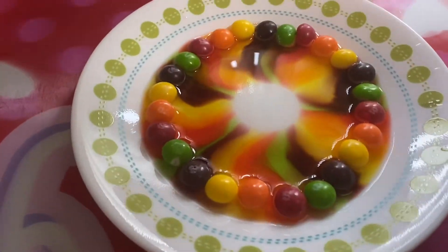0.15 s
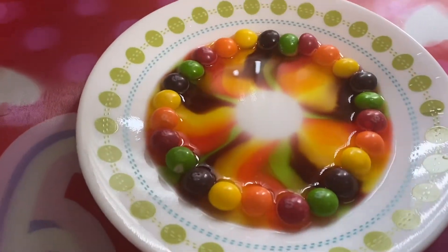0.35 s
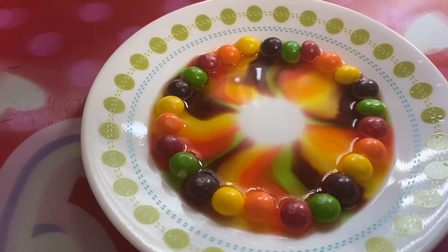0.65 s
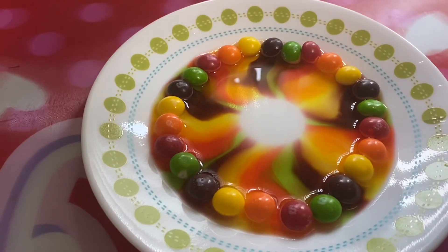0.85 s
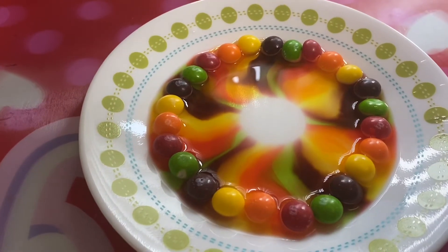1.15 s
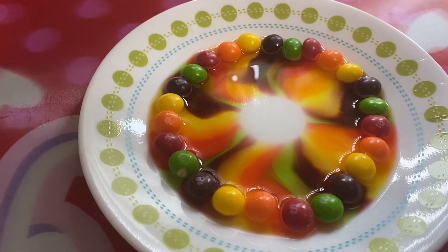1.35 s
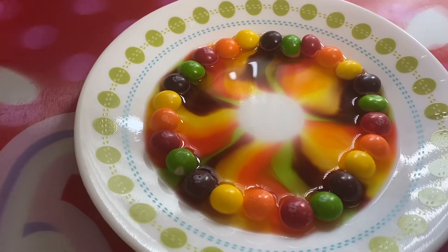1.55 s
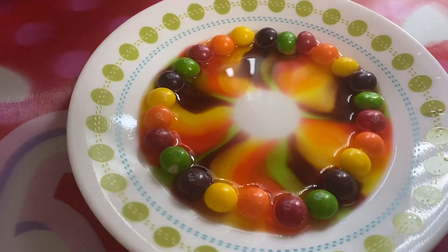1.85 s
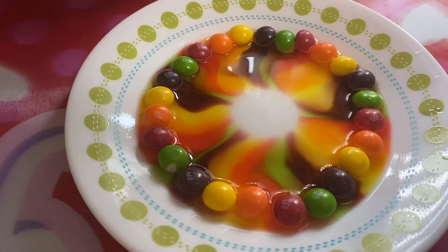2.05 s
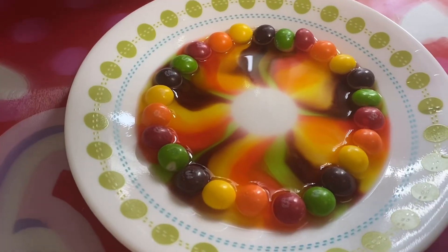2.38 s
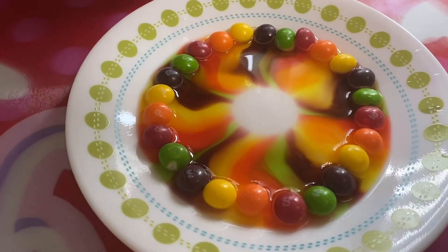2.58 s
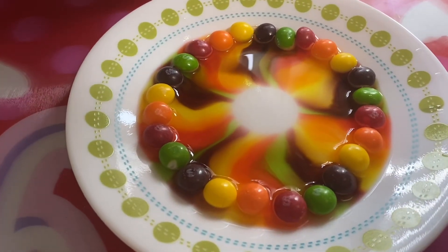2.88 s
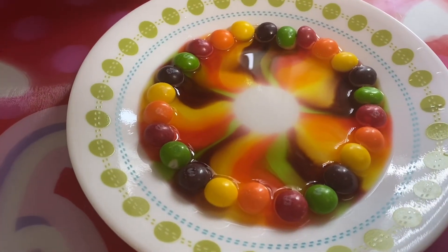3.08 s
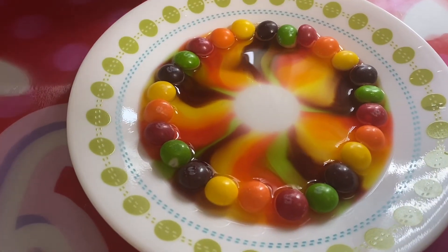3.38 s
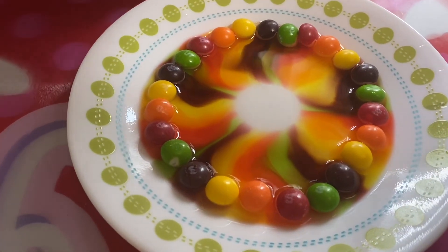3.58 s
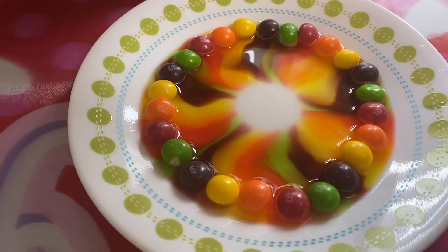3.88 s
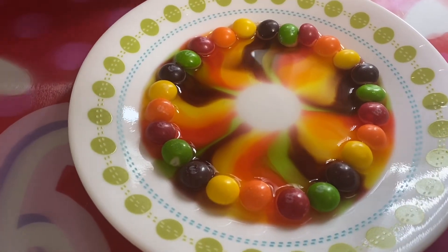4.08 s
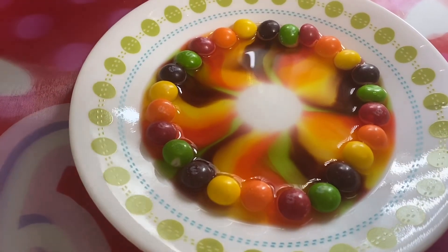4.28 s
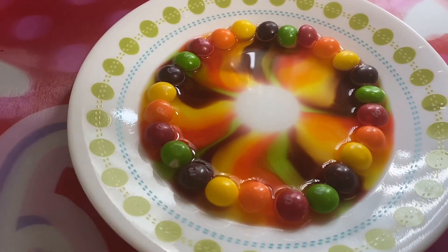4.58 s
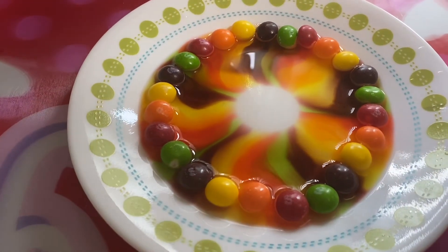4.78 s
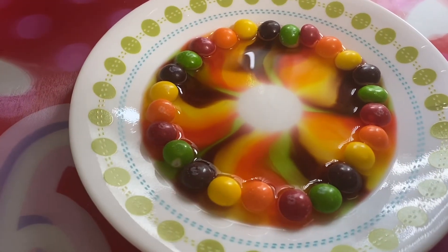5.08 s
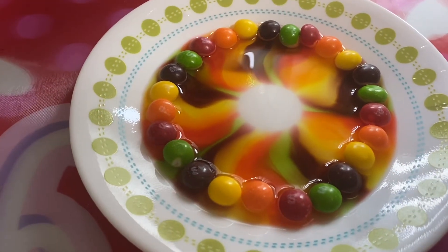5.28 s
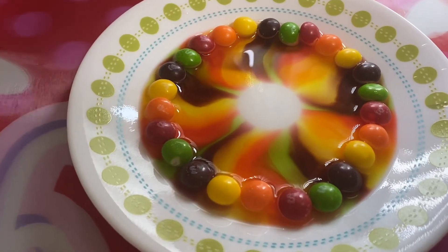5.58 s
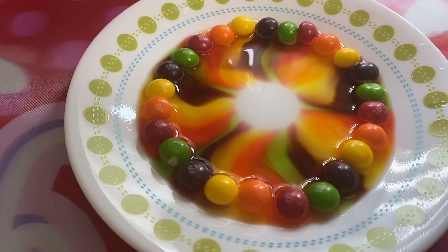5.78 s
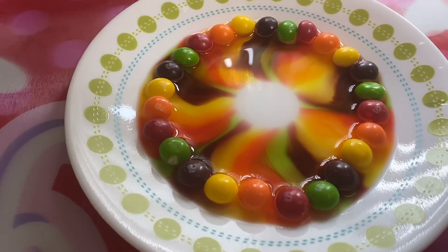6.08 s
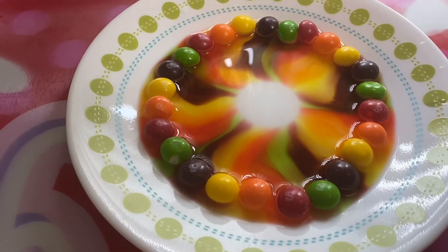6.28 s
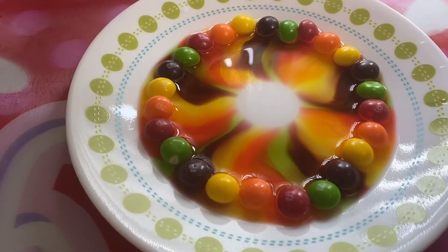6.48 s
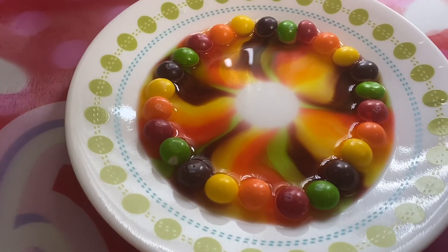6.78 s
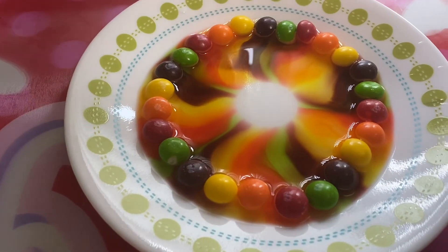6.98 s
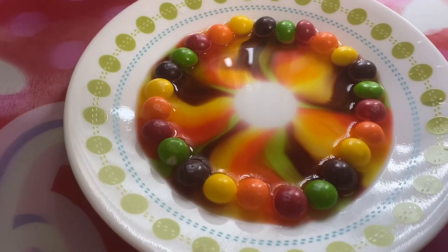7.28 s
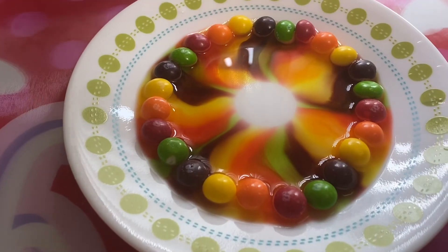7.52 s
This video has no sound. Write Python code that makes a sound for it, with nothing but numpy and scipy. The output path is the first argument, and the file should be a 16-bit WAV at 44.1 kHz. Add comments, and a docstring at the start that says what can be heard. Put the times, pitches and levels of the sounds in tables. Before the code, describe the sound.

A cricket chirps close by, slightly right of a hand-held phone in a quiet room, each chirp a short, high trill in an even rhythm. Other crickets answer loosely in step, and a deeper one calls further off, over faint air noise and a low machine hum. The sound cuts out briefly near the start, then fingers tap lightly on the phone. A few soft low thuds follow, and the hum sinks midway and returns.

```python
"""From the start a tree cricket stridulates, scraper over file, to the right of a hand-held phone, in groups of
two and three wing strokes; neighbours answer in loose step and a deeper cricket calls further off, over air
noise and a machine's hum. At 0.3 s the sound drops out briefly. From 0.5 s a faint high cricket chirps evenly,
fingers tap the case, and soft low swells and thuds follow. The hum sinks towards 4 s and grows again; a faint
blip rises near 6.9 s, before a last thud and tap."""
import sys
import numpy as np
from scipy import signal
from scipy.fft import rfft, irfft
from scipy.io import wavfile
from scipy.ndimage import uniform_filter1d

SR = 44100
rng = np.random.default_rng(int(sys.argv[2]) if len(sys.argv) > 2 else 0)


def to_wav(sig):
    """Store sig (one row per channel, or 1-D mono) as 16-bit WAV at the path in sys.argv[1].

    Samples outside -1..1 are clipped; the rate is SR.
    """
    pcm = np.clip(np.atleast_2d(sig), -1, 1) * 32767
    pcm = np.round(pcm).astype(np.int16)
    wavfile.write(sys.argv[1], SR, pcm.T)  # frames by channels


N = 337365
LEFT_LAG_S = 0.00017  # sound from the right reaches the left microphone port later


def undb(db):
    return 10 ** (np.asarray(db) / 20)


def curve(rows):
    """Linear interpolation of (time [s], value) rows to a value per sample."""
    return np.interp(np.arange(N) / SR, *np.transpose(rows))


def waver(rate_hz):
    """Slow random modulation: held levels, smoothed twice, with a spread near 1."""
    hold = int(SR / rate_hz)
    steps = np.repeat(rng.standard_normal(N // hold + 1), hold)
    return 1.375 * uniform_filter1d(uniform_filter1d(steps, hold), hold)[:N]


def bouts(rows, rise_s, fall_s, rest_db):
    """Exponential growth and decay about each bout: 20 dB per rise_s and per fall_s, above a floor."""
    t, db = np.arange(N) / SR, np.full(N, float(rest_db))
    for start, length, top_db in rows:
        below_db = 20 * np.maximum((start - t) / rise_s, (t - start - length) / fall_s).clip(0)
        db = np.maximum(db, top_db - below_db)
    return undb(db)


def noise(spectrum, shared, left_db=-1.5):
    """Partly coherent stereo noise of rms 1: the shared fraction of its power arrives later on the left."""
    hz, db = np.transpose(spectrum)
    bins = np.arange(N // 2 + 1) * SR / N
    gain = undb(np.interp(np.log(bins + 1), np.log(hz), db, -100, -100))
    common, left, right = rfft(rng.standard_normal((3, N))) * gain
    common = common * np.exp(-2j * np.pi * bins * np.array([[LEFT_LAG_S], [0]]))
    mixed = np.sqrt(shared) * common + np.sqrt(1 - shared) * np.array([left, right])
    out = irfft(mixed, N) * undb([[left_db], [0]])
    return out / np.sqrt(np.mean(out ** 2))


def add(out, sound, start_s):
    """Superposition: mix a short sound in at start_s."""
    i = int(start_s * SR)
    a, b = max(i, 0), min(i + sound.shape[-1], N)
    if b > a:
        out[..., a:b] += sound[..., a - i:b - i]


def ambience():
    """Broadband noise: low air, a distant band near 2.3 kHz and a thin hiss add in power."""
    # spectra: (frequency [Hz], relative density [dB])
    air_spectrum = [(18, -35), (30, -14), (59, -9.5), (96, -1), (284, -14.5), (617, -20), (1280, -29.5),
                    (1700, -31), (2210, -69), (3740, -120)]
    far_spectrum = [(880, -45), (1500, -32.5), (1980, -11.5), (2130, -10), (2270, -1.5), (2350, -5),
                    (2920, -15), (3050, -34), (3200, -60), (4160, -92), (7040, -120)]
    hiss_spectrum = [(2180, -66), (3700, -5.5), (4880, -6), (5400, -7.5), (12000, -11), (14600, -13.5),
                     (15500, -22.5)]
    air = undb(-61 + 0.65 * waver(3.004)) * noise(air_spectrum, shared=0.64)
    far = undb(-53 + 2.35 * waver(5)) * noise(far_spectrum, shared=0.16)
    return air + far + undb(-75.5) * noise(hiss_spectrum, shared=0.092)


def machine_hum(hz=107.9):
    """A motor's periodic vibration radiates one spectral line, wavering in pitch and level."""
    # hum envelope: (time [s], level [dB])
    levels = [(0.0, -55), (0.3, -56), (0.5, -65), (0.96, -60.5), (2.17, -67.5), (2.47, -60.5), (3.5, -69.5),
              (3.98, -75), (4.44, -64.5), (5.12, -61.5), (5.72, -57.5), (7.65, -53.5)]
    phase = 2 * np.pi * np.cumsum(hz + .5 * waver(4)) / SR
    return np.sqrt(2) * undb(curve(levels) + 1.2 * waver(8.9)) * np.sin(phase)


def low_rumble():
    """Modulated low noise: soft thuds and swells, mostly on the right, several on the near chirps."""
    # thuds and swells: (time [s], duration [s], level [dB])
    swells = [(.86, 0.52, -47), (1.45, .06, -50.5), (1.66, .22, -54.5), (2.27, .06, -45.5),
              (4.89, 0.045, -53.5), (5.08, 0.044, -53), (7.09, .05, -52)]
    # (frequency [Hz], relative density [dB])
    spectrum = [(20, -13), (36, -10.5), (50, -3.5), (65, -2.0), (95, -17.5)]
    rumble = noise(spectrum, shared=0.44, left_db=-12) * undb(1.5 * waver(8))
    return rumble * bouts(swells, rise_s=0.095, fall_s=0.13, rest_db=-60.5)


def finger_taps():
    """Impact excitation: each tap sets off a heavily damped tone and a band of noise in the case."""
    # taps: (time [s], relative level [dB], frequency [Hz])
    taps = [(0.5, -44.5, 293), (0.645, -53, 232), (0.787, -55, 342), (0.814, -52, 322), (0.934, -52, 365),
            (0.954, -49.5, 284), (1.018, -56, 353), (1.077, -50.5, 315), (1.093, -50.5, 198),
            (1.128, -52, 314), (7.489, -62, 272)]
    out = np.zeros((2, N))
    t = np.arange(SR // 10) / SR
    case_band = signal.butter(3, (350, 850), "band", fs=SR, output="sos")
    envelope = np.minimum(t / 0.0014, 1) * np.exp(-t / 0.0092)
    for start, db, hz in taps:
        knock = np.sin(2 * np.pi * hz * t) + 2.14 * signal.sosfilt(case_band, rng.standard_normal(len(t)))
        add(out, undb(db) * knock * envelope * undb([[-6], [3]]), start)
    return out


def blip(from_hz=700, to_hz=790):
    """A linear frequency sweep, heard as one faint rising blip."""
    out = np.zeros((2, N))
    tone = stroke(.045, from_hz, sag=1 - to_hz / from_hz, cycles=0, lag_s=0, harmonics=[(1, 0, 0)])
    add(out, undb(-65) * tone, start_s=6.855)
    return out


def stroke(length_s, hz, sag, cycles, lag_s, harmonics):
    """Stridulation: scraper crosses file, and the pitch sinks by the fraction sag as the wings slow."""
    t = np.arange(int((length_s + .001) * SR)) / SR - np.array([[lag_s], [0]])
    progress = np.clip(t / length_s, 0, 1)
    phase = 2 * np.pi * (hz * t * (1 - sag * progress / 2) + cycles)
    swell = np.sin(np.pi * progress ** 0.88).clip(0)
    # overtones need a hard stroke, so they swell more sharply
    return sum(undb(db + np.array([[left_db], [0]])) * swell ** (1 + 0.069 * k) * np.sin(k * phase)
               for k, db, left_db in harmonics)


def chorus(count, hz, spread, sag, period_s, lag_s, scatter_db, octave_db):
    """Incoherent sources: each cricket strokes at its own pitch and rate; the sum has rms 1."""
    out = np.zeros((2, N))
    for detune, offset, side in rng.uniform(-1, 1, (count, 3)):
        own_hz, own_lag_s = hz * (1 + spread * detune), lag_s + .00006 * side
        for k, (jitter, force, phase) in enumerate(rng.standard_normal((int(N / SR / .01), 3))):
            start = (k + offset + .12 * jitter) * period_s * (1 + .04 * detune)
            if start < N / SR:
                harmonics = [(1, scatter_db * force, -5.5), (2, octave_db, -8)]
                add(out, stroke(0.688 * period_s, own_hz, sag, 10 * phase, own_lag_s, harmonics), start)
    return out / np.sqrt(np.mean(out ** 2))


def high_cricket():
    """Periodic gating of a stroke train gives faint, even chirps."""
    song = chorus(1, hz=5030, spread=.002, sag=0.022, period_s=.017, lag_s=0, scatter_db=0, octave_db=-26.5)
    chirps = [(start, .12, -79.5) for start in np.arange(.5, N / SR, .31)]
    return song * bouts(chirps, rise_s=.02, fall_s=.02, rest_db=-120)


def deep_cricket():
    """Beating: three detuned stroke trains blend into one long, deeper call."""
    # calls: (time [s], duration [s], level [dB])
    calls = [(-.05, 0.36, -54.5), (.78, 0.29, -53.5), (1.56, 0.31, -52), (2.36, 0.29, -51),
             (3.17, .28, -52), (4.0, 0.23, -52), (4.72, 0.33, -52), (5.52, 0.33, -53), (6.31, .35, -53.5),
             (7.13, .27, -51.5)]
    song = chorus(3, hz=2164, spread=0.018, sag=.11, period_s=.026, lag_s=.0001,
                  scatter_db=1.5, octave_db=-33.5)
    return song * bouts(calls, rise_s=0.16, fall_s=0.17, rest_db=-75)


def neighbours():
    """Loose synchrony: three crickets swell together around each near chirp."""
    # answers: (time [s], duration [s], level [dB])
    answers = [(-.1, 0.38, -53), (.50, 0.31, -49), (.93, .25, -49), (1.30, .31, -47), (1.81, 0.23, -45.5),
               (2.22, 0.24, -47), (2.68, 0.17, -44.5), (3.10, 0.2, -46), (3.50, 0.22, -47),
               (3.95, 0.24, -47), (4.39, 0.2, -52.5), (4.83, 0.25, -46), (5.30, 0.2, -44), (5.69, 0.3, -50),
               (6.17, 0.28, -49), (6.62, 0.24, -46), (7.05, .33, -50), (7.52, .2, -47)]
    song = chorus(3, hz=2435.7, spread=0.021, sag=0.096, period_s=.025, lag_s=0.000079,
                  scatter_db=3, octave_db=-26)
    return song * bouts(answers, rise_s=0.047, fall_s=.07, rest_db=-64.5)


def reverberation(sound, t60_s=0.19, level_db=-13.5):
    """Diffuse reflections decay exponentially, with a separate tail for each port."""
    t = np.arange(SR // 2) / SR
    tail = rng.standard_normal((2, len(t))) * np.exp(-np.log(1000) * t / t60_s) * (t > .003)
    tail = signal.lfilter([1], [1, -.7], tail)  # soft surfaces absorb the treble
    tail /= np.sqrt(np.sum(tail ** 2, axis=1, keepdims=True))
    return undb(level_db) * signal.fftconvolve(sound, tail, axes=1)[:, :N]


def chirp_hiss(near):
    """Amplitude modulation: a flickering treble hiss follows the envelope of the near chirps."""
    # (frequency [Hz], relative density [dB])
    spectrum = [(3300, -11.5), (4500, 8), (6000, -1), (7100, 2), (8300, -9), (9500, -2.5), (10800, -11.5),
                (12000, -7), (13300, -12.5), (14400, -8.5), (15600, -12)]
    power = uniform_filter1d(near[1] ** 2, int(0.055 * SR))
    envelope = np.sqrt(uniform_filter1d(power, int(0.0092 * SR)).clip(0))
    swell = undb(-65) * np.tanh(1.95 * envelope / envelope.max())
    return swell * undb(2.5 * waver(300)) * noise(spectrum, shared=0.061)


def near_cricket(wing_hz=2460, sag=0.071, flutter=.2):
    """Stridulation in chirps of 2 + 3 or 2 + 3 + 3 strokes; uneven teeth make the level flutter."""
    # chirps: (time [s], relative level [dB], strokes [count], gain of the opening stroke [dB])
    chirps = [(-.072, -28.5, 8, 2), (.558, -33, 5, -15), (.970, -31, 8, -5.5), (1.426, -31, 5, -3),
              (1.846, -30, 5, -4), (2.253, -31.5, 8, -4.5), (2.745, -31.5, 5, -1), (3.140, -31.5, 5, -0.5),
              (3.533, -30.5, 8, -3), (4.004, -31, 5, 0.5), (4.405, -31.5, 8, -3.5), (4.882, -32.5, 5, -1.5),
              (5.289, -31, 5, -2), (5.717, -31, 8, -4.5), (6.194, -32, 8, -1), (6.654, -32, 5, -5),
              (7.076, -31, 8, -5), (7.561, -29.5, 5, -2.5)]
    # strokes of one chirp: (time from the chirp [s], duration [s], relative level [dB])
    strokes = [(-.006, .017, 0), (.015, .023, 0), (.044, .020, -1), (.066, .021, 0), (.089, .023, 0),
               (.119, .020, 0), (.142, .020, 0), (.164, .022, 0)]
    # wing harmonics: (harmonic number, relative level [dB], left minus right [dB])
    harmonics = [(1, 6, -1.5), (2, -20.5, -3), (3, -24, -10), (4, -46.5, -2), (5, -53, -3)]
    out = np.zeros((2, N))
    scatter = rng.standard_normal((len(chirps), len(strokes), 4))
    for (start, chirp_db, count, opening_db), variations in zip(chirps, scatter):
        for k, (after, length, stroke_db) in enumerate(strokes[:count]):
            detune, phase, force, jitter = variations[k]
            tone = stroke(length, wing_hz + 12 * detune, sag, 10 * phase, LEFT_LAG_S, harmonics)
            db = chirp_db + stroke_db + opening_db * (k == 0) + .6 * force
            add(out, undb(db) * tone, start + after + 0.00045 * jitter)
    return out * (1 + flutter * waver(300))


def scene():
    """Superposition of the insects, their reflections, the background, the rumble and the taps."""
    near = near_cricket()
    insects = near + neighbours() + deep_cricket() + high_cricket()
    background = chirp_hiss(near) + ambience() + machine_hum() + blip()
    return insects + reverberation(insects) + background + low_rumble() + finger_taps()


def record(dry, cutoff_hz=15700):
    """Attenuation: the signal drops out for a moment and fades back; a steep low-pass cuts the top."""
    # dropout: (time [s], gain [dB])
    dropout = [(.312, -2), (.318, -15), (.345, -72), (.376, -66), (.386, -13), (.43, -4.5), (.5, -2)]
    low_pass = signal.ellip(10, .2, 60, cutoff_hz, fs=SR, output="sos")
    return signal.sosfilt(low_pass, dry * undb(curve(dropout)))


dry = scene()
out = record(dry)
to_wav(out)
```